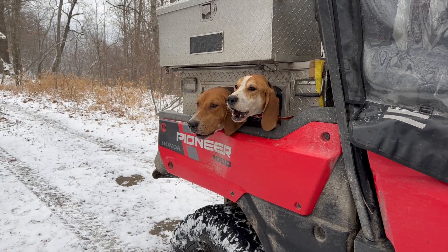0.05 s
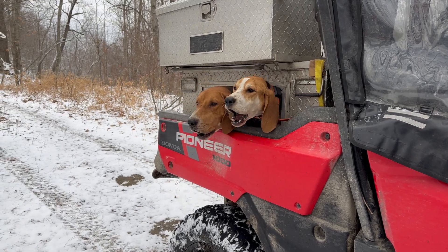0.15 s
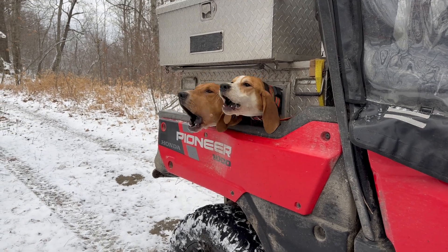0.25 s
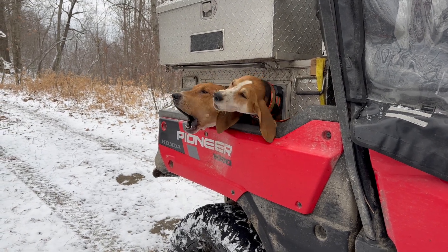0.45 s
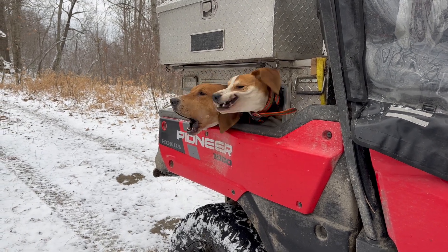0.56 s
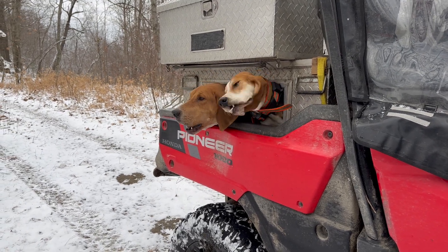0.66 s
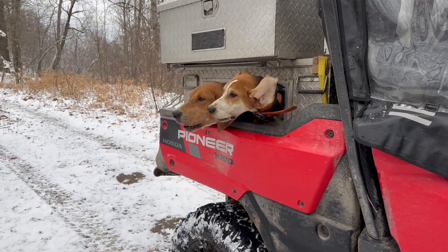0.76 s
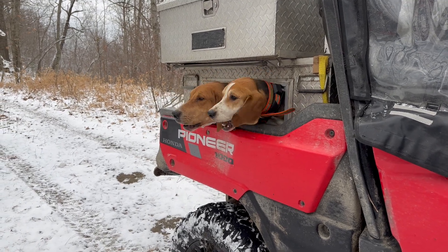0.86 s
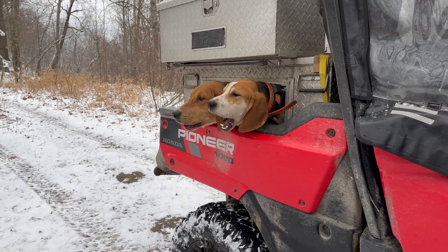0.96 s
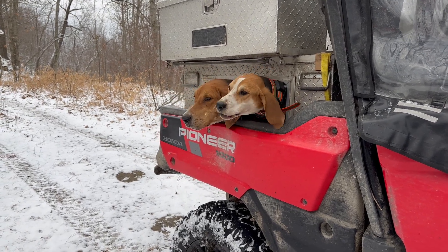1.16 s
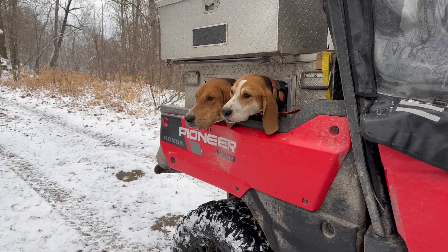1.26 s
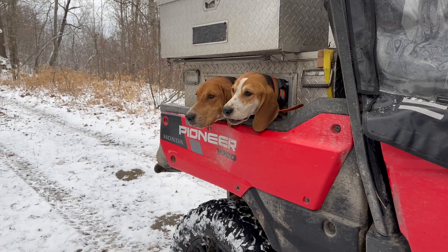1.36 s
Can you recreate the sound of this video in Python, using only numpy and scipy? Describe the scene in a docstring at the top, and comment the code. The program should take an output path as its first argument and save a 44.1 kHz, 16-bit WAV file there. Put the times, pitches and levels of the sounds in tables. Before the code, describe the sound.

Two hounds baying in snowy woods: a high yelp running into a bawl, then one short bark

```python
"""Two hounds calling from a truck box

In snowy woods a high yelp runs into a long bawl, then comes a bark, all before a pair of microphones.
The vocal folds jump between a whistle-like, a clear and a growling way of vibrating: sines on the pitch
and its halves, noise-spread into rasp, plus puffs of hiss. The box rings, the trees send back a faint wash
and one late echo. Jaws and collars click, coats rustle, light wind rumbles at the microphones."""
import sys
import numpy as np
from scipy import signal
from scipy.fft import rfft, irfft
from scipy.io import wavfile

SR = 44100
rng = np.random.default_rng(int(sys.argv[2]) if len(sys.argv) > 2 else 0)


def put_to_file(sound):
    """Save the sound as 16-bit audio at rate SR, in the file named by the first command-line argument."""
    columns = np.atleast_2d(sound).T  # one column per channel
    safe = np.clip(columns, -1, 1)
    whole_steps = np.round(safe * 32767)
    wavfile.write(sys.argv[1], SR, whole_steps.astype(np.int16))


def convert_level_to_amplitude(level_db):
    """Map a level in decibels to its linear amplitude factor."""
    exponent = np.asarray(level_db, float) / 20
    return 10 ** exponent


N = 61739  # 1.4 s

# Throat colour of the higher overtones in yelp and bawl: frequency_hz, level_db
THROAT = [(1180, -16.5), (2000, 0.5), (2560, -5.5), (2760, -17.5), (2940, -8.5), (3410, -15), (4000, -29.5),
          (4200, -28), (4710, -13.5), (5340, -22), (6410, -26), (6950, -39.5), (7740, -26.5), (9000, -32.5),
          (11700, -62), (19800, -120)]
# Spectrum of the breath hiss in yelp and bawl: frequency_hz, density_db_per_hz
HISS = [(1410, -32.5), (2400, -11), (2580, 4.5), (2950, -20), (3250, -4), (3810, -7.5), (4620, 0.5),
        (7350, -17), (8020, -11), (12000, -13.5), (14800, -22), (15600, -31), (16200, -62)]


def evened(x):
    """Scales each channel to an rms of one."""
    return x / np.sqrt(np.mean(abs(x) ** 2, -1, keepdims=True) + 1e-20)


def read(points, hz):
    """Reads a table of frequency and value along a logarithmic frequency axis."""
    f, value = np.transpose(points)
    return np.interp(np.log(hz + 1), np.log(f + 1), value)


def colour(x, points):
    """Shapes the spectrum by a table; nothing passes outside it."""
    hz = np.fft.rfftfreq(x.shape[-1], 1 / SR)
    inside = (hz > points[0][0]) & (hz < points[-1][0])
    return irfft(rfft(x) * convert_level_to_amplitude(read(points, hz)) * inside, x.shape[-1])


def slow(hz, count=1):
    """Lowpassed noise of unit rms, its spectrum rolling off smoothly around hz."""
    f = np.fft.rfftfreq(N, 1 / SR)
    rolloff = np.exp(-(f / hz) ** 2)
    return evened(irfft(rfft(rng.standard_normal((count, N))) * rolloff, N))


def rasp(count):
    """Complex noise that spreads a line into a narrow band, as unsteady folds do."""
    z = slow(162, count=2 * count)
    return z[:count] + 1j * z[count:]


def voice(table, throat, breath):
    """Vocal folds: overtones on the pitch, half-pitch lines, rasp round them and a puff of hiss each cycle.

    Returns the call and its lowest overtone as a complex wave."""
    # Lines at 1/2, 3/2, .. of the pitch: level_db
    half_lines_db = [-9.5, 1, -6, -9, -20]
    # The head radiates little bass: frequency_hz, level_db
    chest = [(40, -60), (150, -34), (220, -14), (300, -12), (380, 0), (20000, 0)]
    rest_jitter, rasp_jitter = 0.0017, 0.03  # relative pitch wobble at rest and per unit rasp
    late_rad = 0.59  # each overtone lags the one below a little more
    rasp_growth = 0.91  # exponent of the rise in rasp with overtone number
    half_rasp_db = -11
    puff_cycles = 0.47  # decay of each puff

    t = np.arange(N) / SR
    rows = np.array(table).T
    start_s, end_s = rows[0][0], rows[0][-1]
    hz, *low_db, high_db, half_db, rasp_db, hiss_db = [np.interp(t, rows[0], c) for c in rows[1:]]
    gate = np.clip(np.minimum(t - start_s, end_s - t) / 0.004, 0, 1)

    wobble = (rest_jitter + rasp_jitter * convert_level_to_amplitude(rasp_db)) * slow(190)[0]
    half_turn = np.exp(2j * np.pi * np.cumsum(hz * (1 + wobble)) / SR / 2)  # wave at half the pitch

    def line(k):
        return half_turn ** (2 * k) * np.exp(-1j * late_rad * k ** 2)

    z = rasp(count=6)
    low = []
    for i, db in enumerate(low_db):
        k = i + 1
        roughness = 1 + convert_level_to_amplitude(rasp_db) * k ** rasp_growth * z[i]
        low.append(convert_level_to_amplitude(db) * line(k) * roughness)
    high = sum(convert_level_to_amplitude(read(throat, k * hz)) * (k * hz < 9000) * line(k) for k in range(5, 24))
    high = convert_level_to_amplitude(high_db) * high * (1 + 4 * convert_level_to_amplitude(rasp_db) * z[5])
    half = sum(convert_level_to_amplitude(db) * half_turn ** (2 * k + 1) for k, db in enumerate(half_lines_db))
    half = convert_level_to_amplitude(half_db) * half * (1 + convert_level_to_amplitude(half_rasp_db) * z[4])
    tone = sum(low) + half + high

    cycle = np.angle(half_turn ** 2) / (2 * np.pi) % 1
    puffs = 0.3 + np.exp(-cycle / puff_cycles)
    hiss = evened(colour(puffs * rng.standard_normal(N), breath))
    call = gate * (np.sqrt(2) * tone.real + convert_level_to_amplitude(hiss_db) * hiss)
    return colour(call, chest), gate * low[0]


def yelp_call():
    """High hound: the folds jump in pitch and roughness along the table."""
    # Levels ahead of the head's loss of bass: time_s, pitch_hz, overtone_1_db, overtone_2_db, overtone_3_db,
    # overtone_4_db, higher_overtones_db, half_pitch_lines_db, rasp_db, throat_hiss_db
    yelp = [(.177, 739, -63, -72.5, -80.5, -90, -90, -82.5, -43, -84.5),
            (.184, 779.2, -28.5, -44, -71, -85.5, -91.5, -67.5, -35.5, -73),
            (.195, 804, -23.5, -43, -56, -82.5, -88, -65.5, -33, -61.5),
            (.208, 839.4, -22, -39.5, -57, -81, -84, -57.5, -26, -59),
            (0.213, 844.5, -26, -38.5, -68.5, -73.5, -73.5, -52, -3, -57.5),
            (0.233, 804, -20.5, -40.5, -69, -72, -80, -54, 0, -47.5),
            (0.25, 821.8, -20, -32.5, -65, -72.5, -74, -52.5, -11.5, -53),
            (0.257, 668, -26, -38.5, -56, -72, -76, -70, -5.5, -47),
            (0.285, 692, -22.5, -40.5, -59.5, -80.5, -75, -71.5, -11.5, -49),
            (0.331, 683, -23, -37, -54, -77, -68.5, -69, -9, -54),
            (0.351, 669.5, -23, -33, -72, -77.5, -76, -69, -13, -51.5),
            (0.359, 698.3, -15.5, -48.5, -64, -75, -79, -71.5, -15.5, -50.5),
            (0.367, 663, -21.5, -30, -56.5, -80.5, -81.5, -73.5, -21.5, -55.5),
            (0.377, 706, -20.5, -40.5, -56, -79, -68.5, -67, -16.5, -56),
            (0.407, 676.4, -26, -43, -39.5, -74.5, -81, -76.5, -27.5, -54.5),
            (0.431, 740, -19, -38.5, -60, -73, -80, -66, -10, -58),
            (0.455, 703, -44, -64, -59, -77.5, -85.5, -81.5, -19.5, -63.5)]
    return voice(yelp, THROAT, HISS)


def bawl_call():
    """Lower voice: the same throat on slower folds that end in a growl."""
    # Levels ahead of the head's loss of bass: time_s, pitch_hz, overtone_1_db, overtone_2_db, overtone_3_db,
    # overtone_4_db, higher_overtones_db, half_pitch_lines_db, rasp_db, throat_hiss_db
    bawl = [(0.2, 414.4, -54.5, -49, -43.5, -37, -50, -73, -8, -63.5),
            (0.214, 417.9, -30.5, -51.5, -45, -41.5, -63.5, -68.5, -4.5, -73),
            (0.252, 408.8, -23, -55.5, -38, -46.5, -57, -77.5, -7, -68.5),
            (0.258, 466, -12.5, -34, -37, -33.5, -62, -68.5, -26, -58),
            (0.28, 442.9, -15.5, -21, -43, -41, -59, -69.5, -24, -59.5),
            (0.294, 450.7, -10, -25.5, -37, -61, -61, -72, -31.5, -63.5),
            (0.306, 444.2, -16.5, -53, -34.5, -54, -66.5, -67.5, -25, -55),
            (0.366, 449.4, -19, -39, -38, -56, -63, -70, -26, -58),
            (0.414, 446.2, -13.5, -50, -36.5, -77.5, -69.5, -70, -27.5, -62),
            (0.416, 466, -13.5, -43.5, -35, -60.5, -63, -73.5, -22.5, -58),
            (0.435, 412.5, -26.5, -39, -31.5, -61, -55, -78.5, -33.5, -55),
            (.445, 431, -20, -37, -29.5, -52.5, -42.5, -89.5, -34, -58.5),
            (.47, 430.2, -21.5, -35.5, -29.5, -48.5, -43, -80, -40.5, -52),
            (.492, 424, -24.5, -40, -22.5, -45, -47, -83.5, -40, -55.5),
            (.512, 418.9, -25.5, -36.5, -27.5, -39.5, -51, -83, -37.5, -53),
            (.535, 417.3, -27.5, -31.5, -28, -41, -55.5, -78.5, -36, -55),
            (.558, 414, -27.5, -30, -38.5, -42.5, -56.5, -71, -33.5, -57.5),
            (0.566, 385, -43.5, -16.5, -45.5, -42.5, -63, -52, -20.5, -59.5),
            (0.582, 383, -42.5, -20, -31.5, -32.5, -54.5, -51, -22.5, -56),
            (0.594, 374.3, -56.5, -23.5, -49, -45, -61.5, -32.5, -13, -75),
            (.601, 344.6, -44.5, -38, -40, -55, -77.5, -43.5, -7, -66),
            (.612, 331.6, -42.5, -41, -43, -54.5, -80, -46, -9.5, -67),
            (.628, 323, -40.5, -49, -64, -56, -60.5, -49, -12.5, -81.5),
            (.655, 321.5, -63, -77, -67, -56, -82, -71, -11.5, -77)]
    return voice(bawl, THROAT, HISS)


def bark_call():
    """Short bark: folds as in the other calls, with a throat and breath colour of its own."""
    # Levels ahead of the head's loss of bass: time_s, pitch_hz, overtone_1_db, overtone_2_db, overtone_3_db,
    # overtone_4_db, higher_overtones_db, half_pitch_lines_db, rasp_db, throat_hiss_db
    bark = [(0.968, 505.8, -82, -49, -71, -70, -88.5, -83, -39.5, -78.5),
            (0.978, 494, -89, -29.5, -74, -37.5, -66, -66, -36.5, -65),
            (1.0, 470.2, -99, -26, -78, -34, -81.5, -61, -25, -66),
            (1.005, 480.3, -23.5, -30, -32, -38, -58, -52, -21.5, -56),
            (1.023, 440.5, -24.5, -27.5, -27.5, -35, -55, -43, -20, -58.5),
            (1.049, 445.7, -23.5, -21, -27, -36, -55, -65, -31.5, -58),
            (1.068, 422, -25.5, -23, -54.5, -44, -51, -68, -29, -55.5),
            (1.075, 455, -24.5, -31, -32, -61, -67.5, -25.5, -11.5, -62),
            (1.088, 447.4, -26, -38.5, -56, -60, -71, -40.5, -15, -61),
            (1.098, 458.8, -20.5, -36.5, -52, -56, -65, -33.5, -23, -57),
            (1.11, 433.3, -23, -35.5, -40.5, -51.5, -65.5, -35.5, -22, -62),
            (1.125, 417.8, -25.5, -42.5, -45, -43.5, -66, -39, -21.5, -65.5),
            (1.135, 430, -31.5, -41, -65, -59, -79, -47, -5, -69.5),
            (1.142, 446, -33, -51, -63.5, -76, -82, -50.5, -7.5, -77),
            (1.152, 425, -53.5, -59, -71, -84, -89, -61.5, -3, -80),
            (1.164, 410, -61, -68, -87, -78, -88, -67, -9.5, -78)]
    # Throat colour of the higher overtones: frequency_hz, level_db
    bark_throat = [(1180, -29), (2000, 3.5), (3070, -11.5), (3570, 0.5), (4020, -23), (5340, -30),
                   (6130, -34), (7690, -30), (8350, -20), (9000, -23.5), (11700, -42), (19800, -120)]
    # Spectrum of the breath hiss: frequency_hz, density_db_per_hz
    bark_hiss = [(2240, -38), (3800, 1.5), (6930, 3.5), (7500, -16), (8570, -4), (9270, -4), (14500, -5.5),
                 (15600, -14), (16200, -63)]
    return voice(bark, bark_throat, bark_hiss)[0]


def mixed_tones(high, low):
    """Ragged sum and difference tones, as strong as the product of yelp and bawl."""
    # What each tone is made of: yelp_multiple, bawl_multiple (negative for a difference)
    mixed = [(1, -1), (1, 1), (2, -1), (3, -1), (2, 1)]
    # Against the product of both voices: level_db
    mixed_db = [-9, -1, 2, -2.5, -19.5]
    mixed_rasp_db = -15
    u = high / (abs(high) + 1e-9)
    v = low / (abs(low) + 1e-9)
    lines = 0
    for (m, n), db, z in zip(mixed, mixed_db, rasp(count=len(mixed))):
        tone = u ** m * (v if n > 0 else v.conj())
        lines = lines + convert_level_to_amplitude(db) * tone * (1 + convert_level_to_amplitude(mixed_rasp_db) * z)
    return abs(high * low) * lines.real


def pair(x, table):
    """Level and phase difference between the two microphone ports, split evenly over both."""
    f, db, rad = np.transpose(table)
    hz = np.fft.rfftfreq(N, 1 / SR)
    half = convert_level_to_amplitude(np.interp(hz, f, db) / 2) * np.exp(0.5j * np.interp(hz, f, rad))
    return irfft(rfft(x) * np.array([half, 1 / half]), N)


def at_microphones(yelp, bawl, bark):
    """Direct sound: each call reaches the two ports with its own level and phase differences."""
    # One table per call: frequency_hz, left_minus_right_db, left_lead_rad
    yelp_pair = [(414, -0.95, 0.09), (635, 5.5, 0.17), (838, 1.4, 0.12), (1194, 12, 0.41),
                 (1688, 6.5, 0.05), (2180, 2.5, 0.22), (2939, -3.5, 0.7), (4380, -6.5, 3.5), (6300, 5, 6.1),
                 (8250, -1, 8.1), (11937, 0.3, 6.3)]
    bawl_pair = [(414, 3, 0.06), (620, 3, 0.08), (838, 3.6, 0.3), (1110, 5, 1.4), (1770, 4.5, 1),
                 (2030, 2.5, 0.23), (2980, -3, 4.8), (4327, -4, 4.5), (6033, 7, 2.3), (8150, -3, 0.77),
                 (11937, -1, 0.23)]
    bark_pair = [(414, 1.4, 0.5), (620, 3.5, -0.9), (838, -0.3, 0.05), (1216, 8.5, 1), (1688, -5, 0.6),
                 (2135, 2, 0.96), (2950, -11, 0.84), (4327, 7, 4.5), (6033, 3.5, 2.2), (8155, -0.7, 1.1),
                 (11937, 1, -0.4)]
    return pair(yelp, yelp_pair) + pair(bawl, bawl_pair) + pair(bark, bark_pair)


def woods(x):
    """Decaying noise tails: ring of the box, truck and near trunks, far trees, and one smeared echo."""
    # Colour of what returns: frequency_hz, level_db
    returned = [(300, -19.5), (450, 0.5), (800, 3.5), (1300, 0), (1500, 0.5), (2200, 8), (4000, 13),
                (8000, 8.5), (16000, -5)]
    box_db, box_t60_s = -21, 0.025
    truck_db, truck_t60_s = -25, 0.28  # truck and near trunks
    far_db, far_t60_s = -35, 0.79
    echo_db, echo_s, echo_smear_s = -43.5, 0.205, 0.004

    t = np.arange(SR) / SR
    box, truck, far, echo = rng.standard_normal((4, 2, SR))
    box = box * convert_level_to_amplitude(-60 * t / box_t60_s) * (t > 0.002)
    truck = truck * convert_level_to_amplitude(-60 * t / truck_t60_s) * (t > 0.012)
    far = far * convert_level_to_amplitude(-60 * t / far_t60_s) * (t > 0.05)
    # the ports share part of the echo
    echo = (echo + echo[0]) * np.exp(-((t - echo_s) / echo_smear_s) ** 2)
    shapes = [(box, box_db), (truck, truck_db), (far, far_db), (echo, echo_db)]
    tail = sum(convert_level_to_amplitude(db) * evened(shape) / np.sqrt(SR) for shape, db in shapes)
    return signal.fftconvolve(colour(x, returned)[None], tail, axes=1)[:, :N]


def clicks():
    """Jaws and collars: short noise snaps with a 1 ms rise, partly shared by the two ports."""
    # Each snap: start_s, nominal_peak_db, t60_s, tilt_db_per_octave (about 4 kHz)
    snaps = [(0.0398, -56, 0.03, 17), (0.0864, -45, 0.029, 2.3), (0.096, -47, 0.023, -23),
             (0.6858, -32, 0.024, -4.8), (0.7749, -52, 0.022, -9), (1.1721, -27.5, 0.051, 5.7),
             (1.3509, -41, 0.047, -5.5), (1.3557, -60, 0.033, -15.9)]
    # Spectrum of a snap without tilt: frequency_hz, density_db_per_hz
    click = [(350, -29), (600, 11), (1600, 2.5), (2480, 5), (3320, -3), (6800, -2.5), (7590, -7.5),
             (15100, -34), (16200, -38)]
    crest_db = 12.5  # allowance for a peak over the mean level
    length = 4096
    out, t = np.zeros((2, N + length)), np.arange(length) / SR
    for start_s, db, t60_s, tilt in snaps:
        tilted = [(f, level + tilt * np.log2(f / 4000)) for f, level in click]
        z = rng.standard_normal((3, length))
        snap = evened(colour(z[0] + 1.2 * z[1:], tilted))
        envelope = convert_level_to_amplitude(db - crest_db - 60 * t / t60_s) * np.minimum(t / 0.001, 1)
        start = round(start_s * SR)
        out[:, start:start + length] += envelope * snap
    return out[:, :N]


def wide_noise(shared, points):
    """Coloured noise at both ports, one part shared and one part their own."""
    z = rng.standard_normal((3, N))
    return evened(colour(shared * z[:1] + 0.87 * z[1:], points))


def rustle():
    """Coats and ears moving: noise whose level follows the movement and flickers."""
    # Spectrum: frequency_hz, level_db
    cloth = [(1000, -35), (1700, -1.5), (2280, -1.5), (2830, -10), (3050, -4), (3320, -9), (10500, -14),
             (14300, -18.5), (16200, -34.5)]
    # Movement, flicker aside: time_s, level_db
    movement = [(0.0, -91), (0.1, -73), (0.17, -81.5), (0.64, -61.5), (0.844, -90.5), (0.854, -73),
                (0.96, -67.5), (1.2, -62.5), (1.39, -87), (1.4, -99.5)]
    level_db = np.interp(np.arange(N) / SR, *np.transpose(movement))
    return convert_level_to_amplitude(level_db + 1.5 * slow(60)) * wide_noise(0.45, cloth)


def bump():
    """A low bump in the box: one short swell of a 72 Hz tone."""
    t = np.arange(N) / SR
    peak_s, length_s = 0.907, 0.016
    swell = np.exp(-((t - peak_s) / length_s) ** 2)
    return convert_level_to_amplitude(-53.5) * swell * np.cos(2 * np.pi * 72 * t)


def wind():
    """Light wind at the microphones: low noise, lumpy in level and lumpy differently at each port."""
    # Spectrum: frequency_hz, level_db
    rumble = [(13, -46), (22, -7.5), (65, -2.5), (134, -9.5), (177, -10), (200, -5.5), (260, -22),
              (440, -120)]
    # Gusts, lumps aside: time_s, level_db
    gusts = [(0.0, -82.5), (0.232, -72), (0.368, -74.5), (0.454, -82), (0.532, -69), (0.58, -79),
             (0.602, -62.5), (0.872, -72.5), (0.906, -68), (0.942, -67), (1.358, -69.5), (1.4, -96)]
    lumpy_db = -1  # rms; the sign only turns the random lumps over
    level_db = np.interp(np.arange(N) / SR, *np.transpose(gusts))
    return convert_level_to_amplitude(level_db + lumpy_db * slow(4.5, count=2)) * wide_noise(0.3, rumble)


def earlier_barks():
    """Wash of earlier barks, still dying away among the trees as a fading band of noise."""
    # Spectrum: frequency_hz, level_db
    earlier = [(180, -59), (300, -32), (581, -9), (669, 0), (822, -6.5), (877, -18.5), (1540, -22),
               (1890, -21), (1960, -2), (2590, -44), (4000, -28.5), (5200, -52), (8800, -120)]
    start_db, t60_s = -70, 2.5
    t = np.arange(N) / SR
    return convert_level_to_amplitude(start_db - 60 * t / t60_s + 1.5 * slow(12)) * wide_noise(0.69, earlier)


def still_air():
    """Quiet bed of the place: steady noise that wavers slightly in level."""
    # Spectrum: frequency_hz, level_db
    air = [(88, -48.5), (150, -10), (446, -6.5), (618, -10.5), (857, -3), (971, -17), (1490, -11.5),
           (3000, -27.5), (3900, -56.5), (6600, -120)]
    return convert_level_to_amplitude(-70.5 + 1.5 * slow(7.7)) * wide_noise(0.27, air)


def scene():
    """Direct calls, what box and woods return, then the small sounds and the background."""
    yelp, high = yelp_call()
    bawl, low = bawl_call()
    bark = bark_call()
    yelp = yelp + mixed_tones(high, low)
    direct = at_microphones(yelp, bawl, bark)
    background = rustle() + bump() + wind() + earlier_barks() + still_air()
    return direct + woods(yelp + bawl + bark) + clicks() + background


def low_pass(x):
    """Removes everything above the highest recorded frequency."""
    return signal.sosfilt(signal.butter(12, 16470, fs=SR, output="sos"), x)


def record(dry):
    """Stores the finished mix."""
    return low_pass(dry)


dry = scene()
out = record(dry)
put_to_file(out)
```